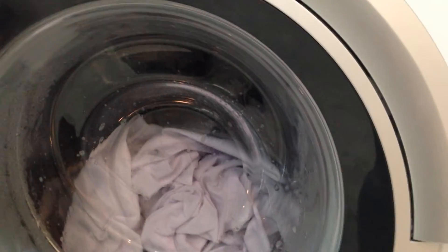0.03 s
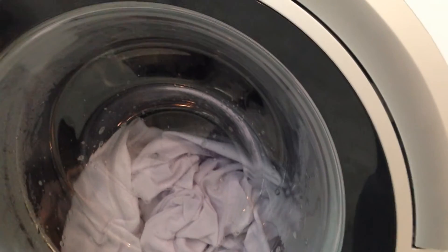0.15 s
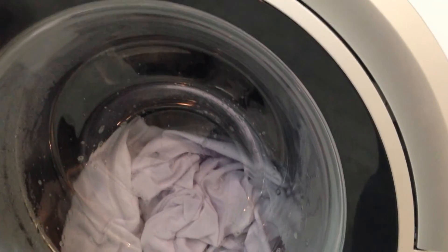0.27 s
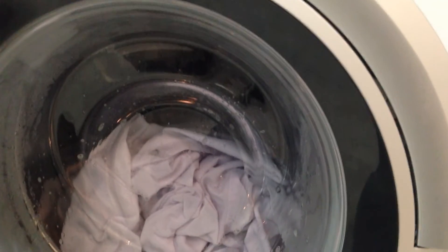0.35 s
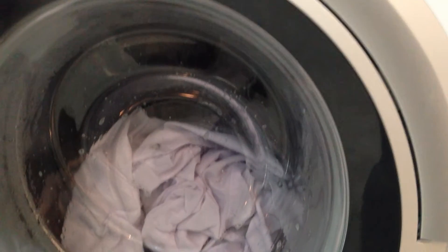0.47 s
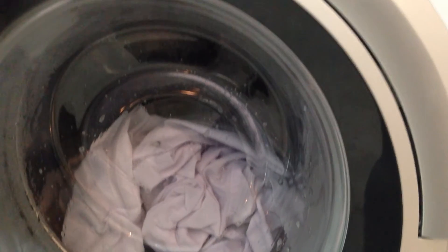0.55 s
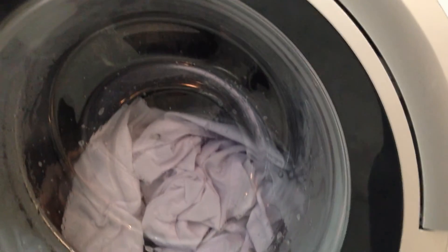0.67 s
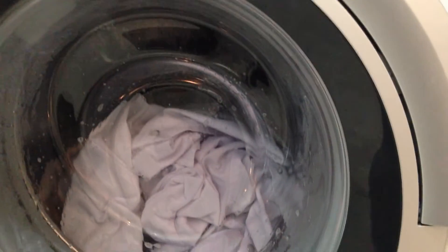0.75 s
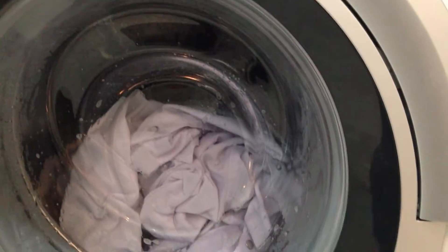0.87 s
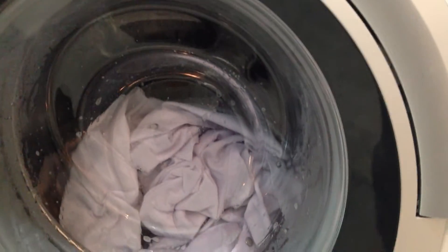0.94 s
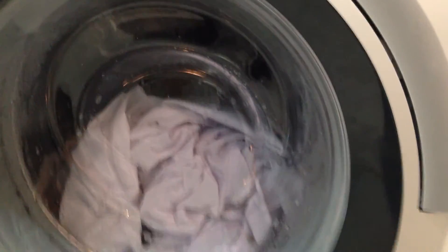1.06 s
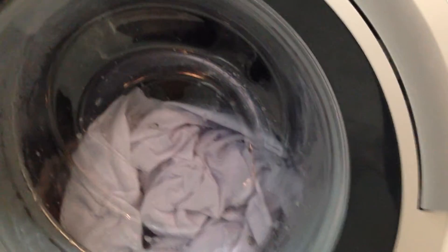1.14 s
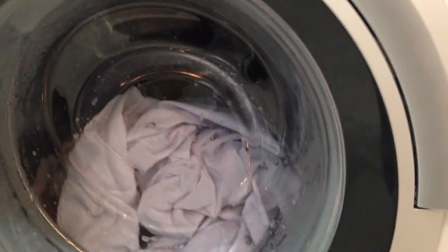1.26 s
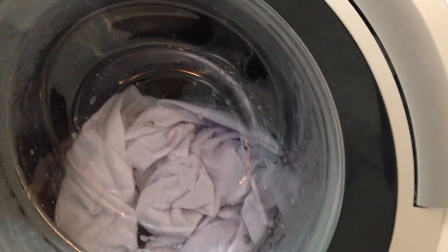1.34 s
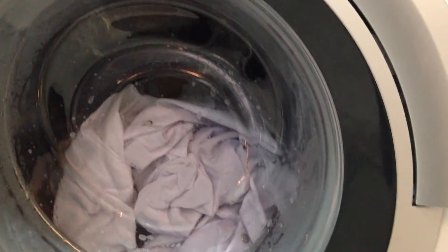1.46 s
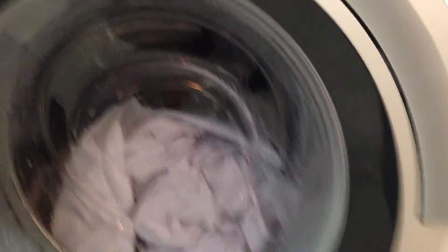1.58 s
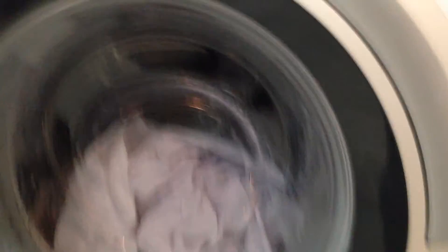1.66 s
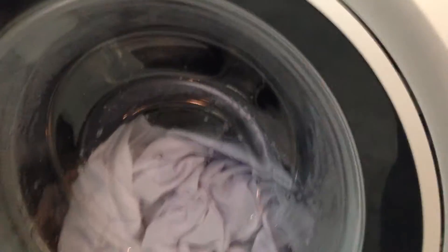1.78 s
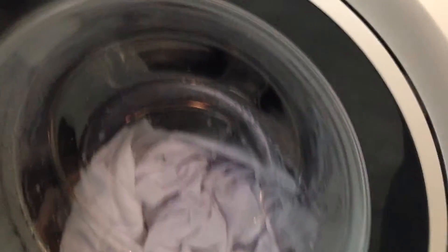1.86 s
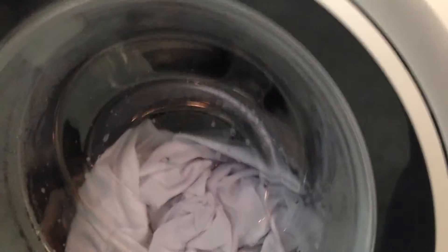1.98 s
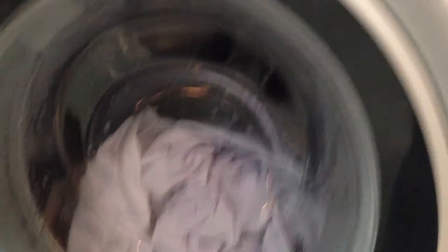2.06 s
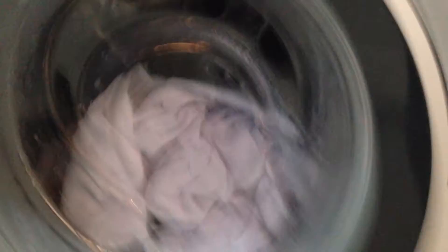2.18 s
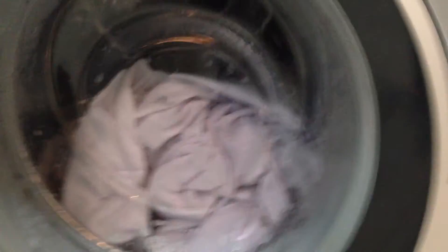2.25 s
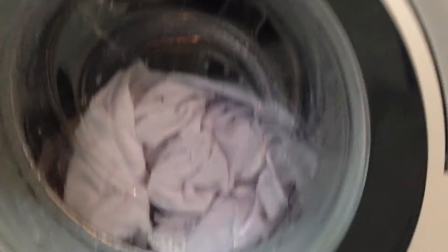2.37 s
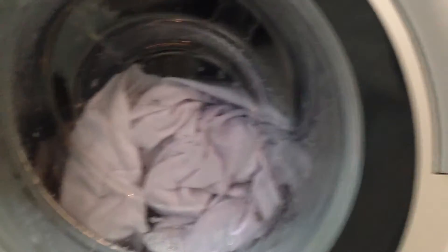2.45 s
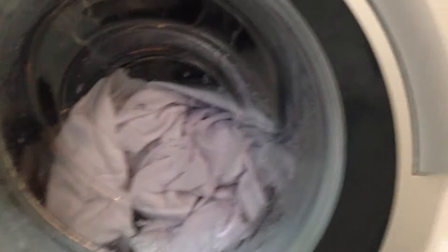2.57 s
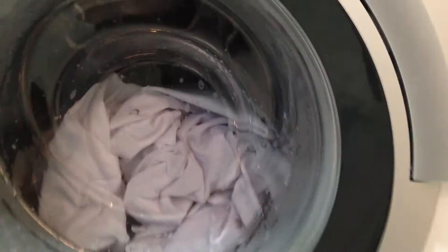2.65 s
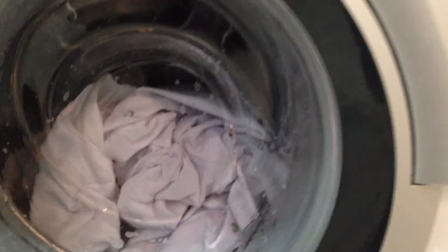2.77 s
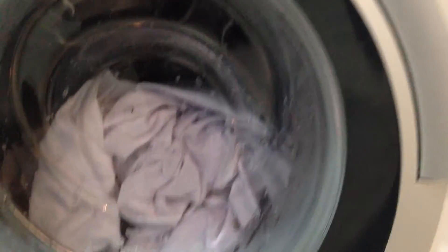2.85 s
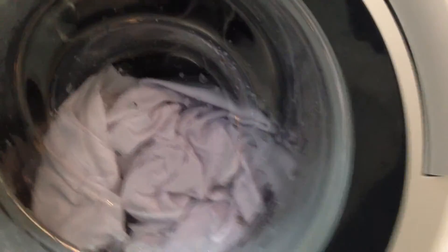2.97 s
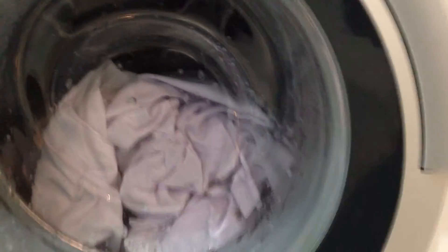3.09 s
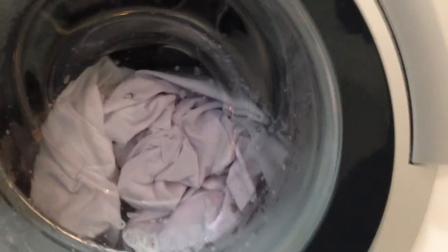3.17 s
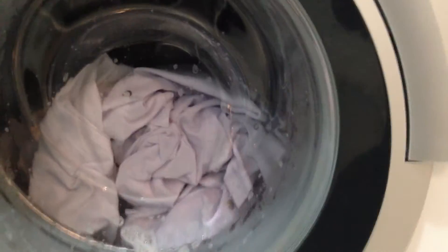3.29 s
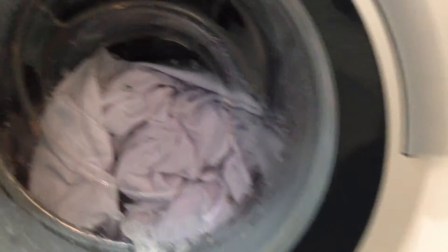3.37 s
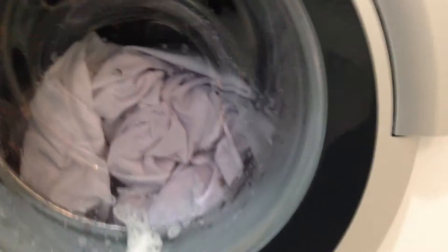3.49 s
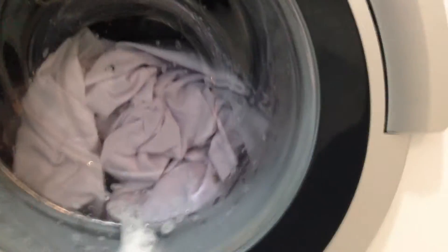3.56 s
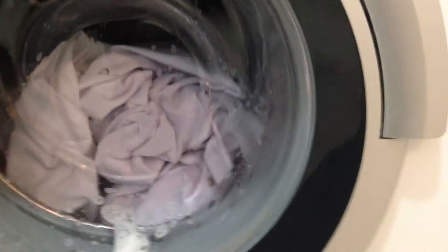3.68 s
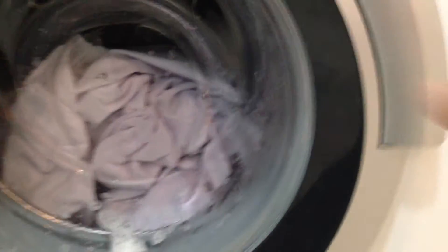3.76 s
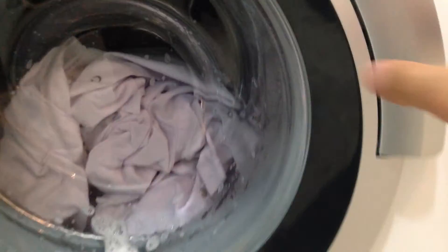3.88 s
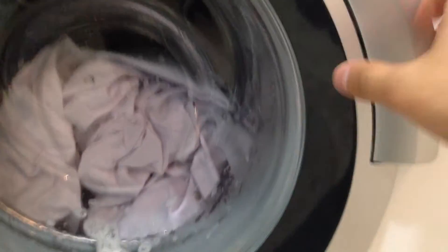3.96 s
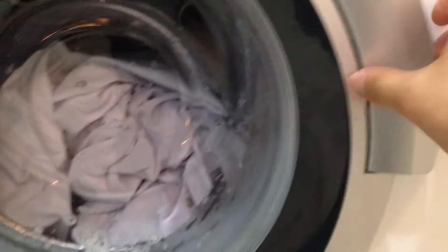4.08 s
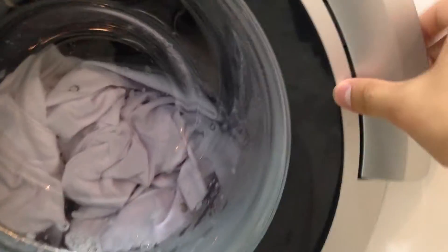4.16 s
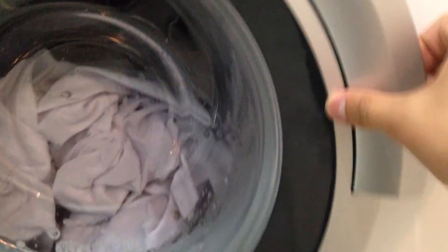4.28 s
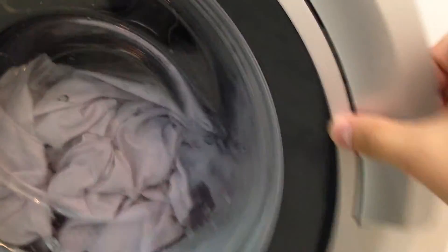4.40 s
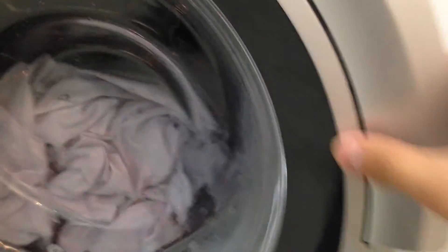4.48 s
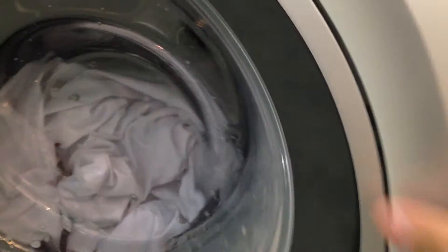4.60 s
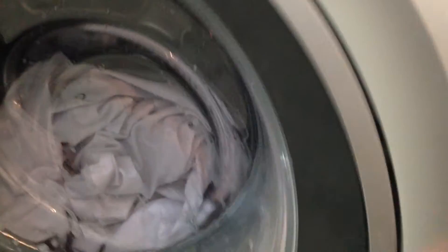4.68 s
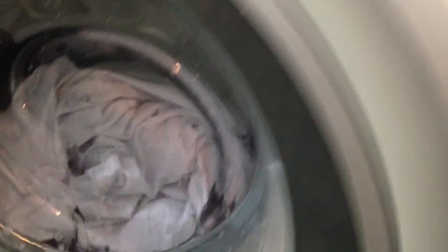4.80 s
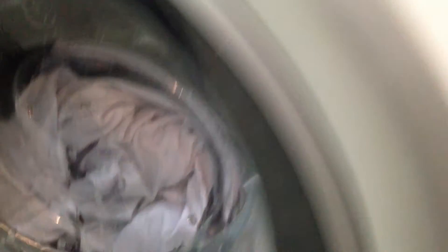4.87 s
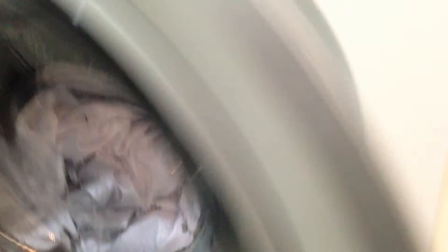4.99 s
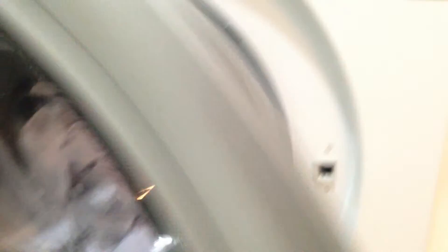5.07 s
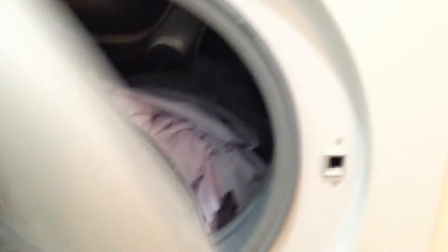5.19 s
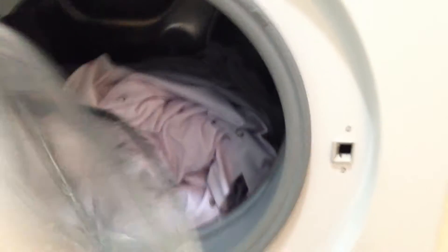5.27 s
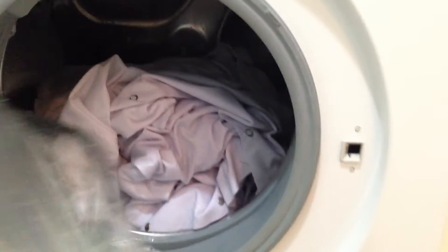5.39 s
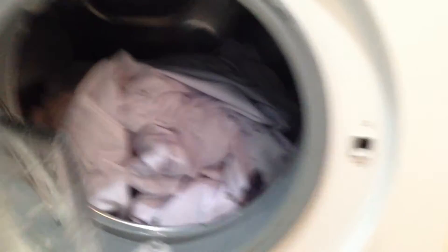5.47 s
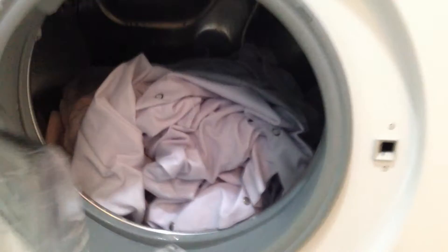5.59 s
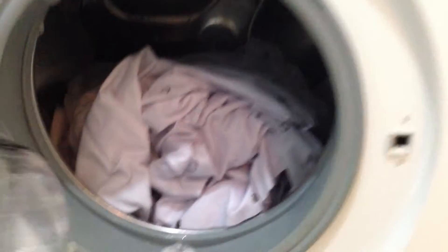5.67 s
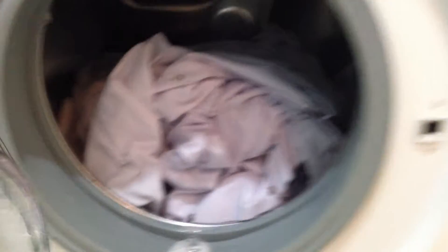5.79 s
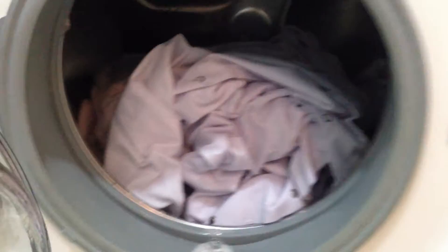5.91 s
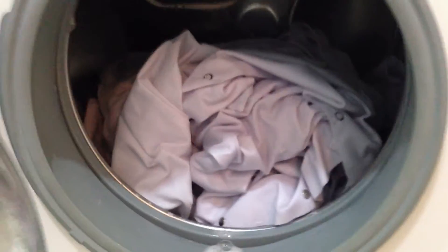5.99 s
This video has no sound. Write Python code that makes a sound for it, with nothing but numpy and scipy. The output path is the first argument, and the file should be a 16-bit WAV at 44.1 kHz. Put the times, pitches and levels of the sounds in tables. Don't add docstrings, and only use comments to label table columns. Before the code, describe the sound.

Quiet room noise, then a light electrical click with a thin ping. After some faint shuffling, a sudden metallic clack with quick rebounds and a deep boom rings briefly in the room. A duller knock follows. About half a second later comes a busy cluster of plastic handle clicks, low door thuds and a bright, dry latch snap with chatter. The close microphone then catches only soft rustle and tiny hinge ticks.

```python
import sys
import numpy as np
from scipy import signal
from scipy.fft import rfft, irfft
from scipy.io import wavfile

SR = 44100
rng = np.random.default_rng(int(sys.argv[2]) if len(sys.argv) > 2 else 0)


def convert_level_to_amplitude(level_db):
    exponent = np.asarray(level_db, float) / 20
    return 10 ** exponent


def file_out(sig):
    cols = np.atleast_2d(sig).T
    lim = np.clip(cols, -1, 1)
    pcm = np.round(lim * 32767).astype(np.int16)
    wavfile.write(sys.argv[1], SR, pcm)


N = 266408


def at_hz(points, hz):
    table_hz, values = np.array(points)[:, 0], np.array(points)[:, 1]
    return np.interp(np.log(np.maximum(hz, 1)), np.log(table_hz), values)


def band(x, low_hz, high_hz):
    return signal.sosfilt(signal.butter(2, [low_hz, high_hz], "band", fs=SR, output="sos"), x)


def rms_one(x):
    return x / np.sqrt(np.mean(x ** 2) + 1e-20)


def peak(s, db, rise_s, fall_s):
    t = np.arange(N) / SR - s
    return convert_level_to_amplitude(db - 20 * np.maximum(-t / max(rise_s, .005), t / max(fall_s, .005)))


def coloured(x, spectrum):
    size = 4096
    gain = convert_level_to_amplitude(at_hz(spectrum, np.fft.rfftfreq(size, 1 / SR)))
    cepstrum = irfft(np.log(gain))
    cepstrum[1:size // 2] *= 2
    cepstrum[size // 2 + 1:] = 0
    return signal.oaconvolve(x, irfft(np.exp(rfft(cepstrum))))[:len(x)]


def bursts(times_s, levels_db, lengths_ms):
    size = 4096
    out = np.zeros(N + size)
    turn = np.exp(-2j * np.pi * np.fft.rfftfreq(size))
    all_shares = rng.uniform(0.059, 1, (len(times_s), 5))
    for s, db, ms, shares in zip(times_s, levels_db, lengths_ms, all_shares):
        delay_samples = 1 + np.round(shares * .1 * np.clip(ms, .5, 40) * SR / 1000)
        delays = turn ** delay_samples[:, None]
        chatter = irfft(np.prod((.78 + delays) / (1 + .78 * delays), axis=0))
        out[round(s * SR):][:size] += convert_level_to_amplitude(db) * chatter
    return out[:N] + 1e-18


def ring(force, modes):
    hz, db, t60_s = np.transpose(modes)[:, :, None]
    t = np.arange(SR // 3) / SR
    response = np.sum(convert_level_to_amplitude(db - 60 * t / t60_s) * np.sin(2 * np.pi * hz * t), axis=0)
    return signal.oaconvolve(force, response)[:N]


def struck(events, modes, gain_db):
    return convert_level_to_amplitude(gain_db) * ring(bursts(*np.transpose(events)), modes)


def snap(events, colour, modes, crack_db, ring_db):
    force = bursts(*np.transpose(events))
    return convert_level_to_amplitude(crack_db) * coloured(force, colour) + convert_level_to_amplitude(ring_db) * ring(force, modes)


def swelling(rows):
    out = np.zeros(N)
    for s, db, hz, t60_s, rise_ms in rows:
        t = np.arange(min(SR, N - round(s * SR))) / SR
        swell = 1 - np.exp(-t * 1000 / rise_ms)
        out[round(s * SR):][:len(t)] += convert_level_to_amplitude(db - 60 * t / t60_s) * swell * np.sin(2 * np.pi * hz * t)
    return out


# frequency in Hz, level in dB.
FLOOR_COLOUR = [(15, -41), (25, -12.5), (55, -2), (86, -4), (183, -1.5), (215, -3.5), (281, -4),
                (349, -9.5), (445, -8.5), (567, -11.5), (895, -15), (1200, -18.5), (3830, -13.5),
                (14300, -17), (15500, -17)]


def quiet_floor():
    return convert_level_to_amplitude(-67) * rms_one(coloured(rng.standard_normal(N), FLOOR_COLOUR))


# start in
# seconds, peak in dB, pitch in Hz, t60 in seconds, rise in ms.
PUSHES = [(0.59, -64, 128, 0.88, 8.5), (0.566, -53, 248, 0.17, 4), (0.58, -60, 338.5, .3, 8),
          (.62, -57.5, 320, .2, 5), (2.33, -42, 188, 0.096, 3.1), (2.349, -42, 172, 0.13, 1.4),
          (2.332, -53, 500, 0.2, 4), (2.34, -58, 350, .1, 4), (2.355, -54, 640, 0.098, 4),
          (2.4, -62, 470, 0.074, 4.4), (3.661, -54.5, 154, 0.43, 22), (2.387, -46, 164.5, 0.21, 2.1),
          (3.066, -41, 62, .06, 3.4), (3.063, -44, 195, 0.32, 8), (3.067, -31.5, 123, 0.11, 3.6),
          (3.114, -27, 131, 0.36, 29), (3.379, -52.5, 124, 0.62, 28), (3.516, -41, 187.2, 0.29, 4.8),
          (3.539, -40, 148, 0.28, 1.1), (3.541, -40, 187, 0.33, 3.9), (3.543, -33, 55, 0.028, 3.5),
          (4.008, -38, 146, 0.24, 8.7), (4.02, -43, 182, 0.19, 8.3), (4.01, -39.5, 87, 0.12, 4.9),
          (4.179, -44, 190, 0.088, 5.9), (4.298, -21.5, 112, 0.064, 4.8), (4.401, -26, 109, 0.13, 6.1),
          (4.303, -47, 750, 0.035, 3.3), (4.319, -38, 840, 0.056, 2.4), (4.35, -36, 730, 0.034, 2.7),
          (4.393, -37, 790, 0.046, 3), (4.402, -34.5, 810, .05, 2.1), (4.41, -34, 1190, 0.045, 2.6),
          (4.418, -45, 670, .04, 3), (4.439, -45, 680, .04, 3), (4.439, -44, 1080, .03, 2.7),
          (4.364, -44, 470, 0.035, 3), (4.44, -42, 312, 0.1, 4.1)]


def thuds():
    return swelling(PUSHES)


# start in seconds, peak in dB, burst in ms.
RELAY_CONTACTS = [
    (0.568, -39, 6),
    (0.571, -38, 8.6),
    (0.584, -49, 12),
    (0.6, -55, 20),
    (0.617, -55, 15),
]
# frequency in Hz, level in dB per Hz.
RELAY_CRACK = [(120, -28), (200, -6), (957, -20), (1430, -30), (1950, -3), (2560, -28), (4750, 6),
               (9140, -10.5), (10000, -6), (13200, -11), (15500, -41)]
# frequency in Hz, level in dB, t60 in seconds.
RELAY_BODY = [(336, -21, 0.068), (511, -13.5, 0.094), (737, -16.5, 0.1), (880, -17, 0.085),
              (980, -18, 0.05), (1720, -11, 0.06), (1970, -11, 0.033), (4300, -18, 0.02), (4630, -14, 0.03),
              (5000, 2.5, 0.014), (5400, -9, .008), (8900, 3.5, 0.007), (12800, 1, 0.0046)]


def relay():
    return snap(RELAY_CONTACTS, RELAY_CRACK, RELAY_BODY, crack_db=17.0, ring_db=-9.5)


# peak time in seconds, peak in dB,
# rise in seconds for 20 dB, fall in seconds for 20 dB, loudest pitch in Hz.
RUB_STROKES = [(.6, -70.5, .02, .15, 700), (1.8, -72, 0.17, 0.43, 1790), (2.19, -64.5, 0.36, 0.27, 1090),
               (2.25, -62.5, 0.11, 0.14, 200), (2.36, -62, 0.064, 0.22, 252),
               (2.35, -70.5, 0.11, 0.18, 5000), (3.55, -56, 0.061, 0.23, 354), (3.962, -75, .5, 0.11, 2454),
               (4.04, -66, 0.082, .5, 249), (4.14, -65.5, 0.2, 0.067, 5000), (4.19, -58, .02, 0.11, 2600),
               (4.23, -54.5, 0.06, 0.54, 456), (4.4, -55, 0.014, 0.078, 900), (4.49, -59, .01, 0.21, 1800),
               (4.41, -55.5, 0.12, 0.11, 291), (4.7, -66, 0.17, 0.28, 7000), (4.76, -75, .1, 0.13, 4040),
               (5.36, -76, 1.2, 0.77, 1474), (5.6, -75, 0.52, 0.92, 4990), (5.9, -71.5, 0.41, 0.41, 4020),
               (5.98, -71, 0.39, 0.47, 250)]
# low edge in Hz, high edge in Hz.
GRAIN_HZ = [(120, 450), (450, 1400), (1400, 3000), (3000, 9000)]
BELOW_DB_PER_OCT, ABOVE_DB_PER_OCT = 6.0, 6
CLUMP_DB, CLUMP_S = 3.0, 0.014


def rustle():
    count = len(GRAIN_HZ)
    unevenness_db = 1.4 * np.minimum(rng.exponential(1, N), 4)
    grains = rng.standard_normal((count, N)) * convert_level_to_amplitude(unevenness_db)
    knots = rng.standard_normal((count, 2000))
    clump_at = np.arange(N) / SR / CLUMP_S
    clumps = np.array([np.interp(clump_at, np.arange(len(k)), k) for k in knots])
    grains = grains * convert_level_to_amplitude(CLUMP_DB * clumps)
    ranges = np.array([rms_one(band(g, *edges)) for g, edges in zip(grains, GRAIN_HZ)])
    centre_hz = np.sqrt(np.prod(GRAIN_HZ, axis=1))
    out = 0
    for s, db, rise_s, fall_s, hz in RUB_STROKES:
        octaves = np.log2(centre_hz / hz)
        colour = convert_level_to_amplitude(-np.maximum(ABOVE_DB_PER_OCT * octaves, -BELOW_DB_PER_OCT * octaves))
        out = out + peak(s, db, rise_s, fall_s) * (colour @ ranges)
    return out


# start in seconds, peak in dB, burst in ms.
PING_HITS = [(.695, -52, 20), (.703, -50, 8), (.727, -52, 10), (.76, -56, 15.5)]
# frequency in Hz, level in dB, t60 in seconds.
PING_BODY = [(349, -5, 0.083), (449, -12.5, 0.11), (1210, -20, .15), (1244, -18, 0.2), (1570, -11, 0.11),
             (1960, -10, .08), (1660, -14, 0.06), (1680, -17, 0.11), (1856, -10, 0.1), (2070, -8, 0.046),
             (2200, -17, .03), (3550, -2, 0.0054), (5000, -1, .006), (7000, 5.5, 0.0044)]


def ping():
    return struck(PING_HITS, PING_BODY, -5.5)


# start in seconds, peak in dB, pitch in Hz,
# t60 in seconds, rise in ms.
MORE_SWELLS = [(.697, -59.5, 1590, 0.47, 8), (.72, -59, 1618, 0.34, 5), (.74, -68, 1523, .6, 15),
               (3.064, -32, 870, 0.13, 3), (3.25, -65, 772, 1.0, 30), (3.13, -45, 880, .35, 20),
               (2.5, -58, 2130, .03, 2), (2.368, -56, 2050, .03, 2), (4.48, -28, 2420, 0.028, 1.5),
               (3.075, -36, 1466, .15, 5), (3.064, -30, 1170, .1, 3), (3.078, -31, 905, .09, 4),
               (3.064, -30, 1900, 0.11, 3), (3.27, -58, 300, 0.36, 15), (4.481, -38, 1150, .05, 2),
               (4.505, -41, 1200, .06, 3), (4.528, -43, 1140, .05, 3), (4.556, -45, 1240, .1, 6.9),
               (4.574, -50, 1200, .05, 3), (4.51, -46, 2500, .04, 2), (4.72, -55, 90, .15, 8),
               (3.515, -47, 85, .1, 5), (3.515, -46, 980, .05, 1.5), (3.1, -40, 1500, .2, 10)]


def more_swells():
    return swelling(MORE_SWELLS)


# start in seconds, peak in dB, burst in ms.
SCUFFS = [(1.775, -65, 23), (1.836, -53, 10), (1.85, -61, 28), (2.14, -51, 21), (2.159, -49, 10),
          (2.172, -50, 13), (2.185, -53, 13.2), (2.2, -52, 13), (2.213, -54, 9.3), (2.245, -59, 25),
          (2.27, -55, 25)]
# frequency in Hz, level in dB, t60 in seconds.
SOLE = [(520, -16, .02), (760, -5, .015), (950, -4, .02), (1230, 1.5, 0.027), (1450, -4, .02),
        (1740, -3, .015), (2480, -12, .01)]


def scuff():
    return struck(SCUFFS, SOLE, -8.0)


# start in seconds, peak in dB, burst in ms.
FINGER_TICKS = [(1.8345, -53, 5), (2.0216, -44, 9.9), (2.03, -49, 8.6), (2.0464, -53, 5),
                (2.0552, -46, 7.8), (2.062, -52, 8), (2.3276, -55, 5.4), (2.368, -56, 7), (4.019, -43.5, 6)]
# frequency in Hz, level in dB, t60 in seconds.
CASING = [(1326, -5.5, 0.03), (2120, 6.5, 0.0045), (3620, 6, 0.0028), (4660, 2, 0.0049), (9100, -2, 0.0086)]


def fingers():
    return struck(FINGER_TICKS, CASING, -7.0)


# start in seconds, peak in dB, burst in ms.
COIL_TICKS = [
    (3.041, -46, 10),
    (3.048, -51.5, 12),
]
# frequency in Hz, level in dB, t60 in seconds.
COIL_BODY = [(1100, -11.5, .02), (1900, -1, .015), (2600, -4, .01), (3800, -5.5, .008), (4950, 0, .015),
             (5700, -3, 0.011)]


def coil():
    return struck(COIL_TICKS, COIL_BODY, -5.0)


# start in seconds, peak in dB, burst in ms.
BOLT = [
    (3.0602, -29, 10),
    (3.062, -22, 9.2),
    (3.064, -19, 7.35),
    (3.0655, -12.5, 4),
    (3.067, -16.5, 6.9),
]
# start in seconds, peak in dB, burst in ms.
BOLT_REBOUNDS = [(3.071, -14.5, 6.9), (3.075, -17, 7.8), (3.08, -17.5, 6), (3.085, -18, 9.1),
                 (3.088, -15.5, 5.8), (3.101, -20.5, 9), (3.121, -25, 12.7), (3.137, -26.5, 11.6)]
# frequency in Hz, level in dB per Hz.
BOLT_CRACK = [(88, -37.5), (150, -6.5), (420, -5), (650, -12), (800, -3.5), (1150, -3), (1400, -7.5),
              (1800, -4.5), (2650, -7.5), (4140, -9.5), (9180, -16), (13800, -17), (15500, -24)]
# frequency in Hz, level in dB, t60 in seconds.
BOLT_BODY = [(274, -15.5, 0.15), (312, -9, 0.2), (386, -16.5, 0.15), (563, -11.5, 0.12), (990, -5, 0.035),
             (1000, -5.5, 0.023), (1234, -9, 0.054), (1540, -5, 0.029), (1770, -19, 0.07),
             (2320, -7.5, 0.046), (3030, -5.5, .03), (5950, -1, 0.01)]
BOLT_CUT_HZ, REBOUND_HZ = 265, 3500


def lock():
    soft = signal.lfilter(*signal.butter(1, REBOUND_HZ, fs=SR), bursts(*np.transpose(BOLT_REBOUNDS)))
    hard = signal.lfilter(*signal.butter(2, BOLT_CUT_HZ, "high", fs=SR), bursts(*np.transpose(BOLT)))
    force = hard + soft
    return convert_level_to_amplitude(29) * coloured(force, BOLT_CRACK) + convert_level_to_amplitude(-22) * ring(force, BOLT_BODY)


# peak time in seconds, level in dB, fall in seconds for 20 dB.
LOW_JOLTS = [(3.12, -50, 0.23), (3.219, -71, 0.58), (3.56, -61, 0.06), (4.051, -60, 0.22),
             (4.251, -49.5, 0.01), (4.5, -52, 0.37), (4.72, -74, -0.2)]
JOLT_RISE_S = 0.057


def rumble():
    noise = rms_one(band(rng.standard_normal(N), 50, 130))
    return noise * sum(peak(s, db + 0.5, JOLT_RISE_S, fall_s) for s, db, fall_s in LOW_JOLTS)


# start in seconds, peak in dB, burst in ms.
KNOCKS = [
    (3.514, -36, 7),
    (3.522, -38.5, 20),
]
# frequency in Hz, level in dB per Hz.
KNOCK_CRACK = [(150, -23), (250, -4), (378, -16), (526, -20), (617, -9), (1200, -5.5), (2180, -9),
               (2850, -29), (6000, -29), (7800, -62), (13200, -120)]
# frequency in Hz, level in dB, t60 in seconds.
KNOCK_BODY = [(515, -11, 0.071), (967, 2, 0.03), (1070, -4, 0.025), (1340, -9, .02)]


def knock():
    return snap(KNOCKS, KNOCK_CRACK, KNOCK_BODY, crack_db=25.5, ring_db=-9.0)


# start in seconds, peak of the grip in dB, then rim, lever and hook in dB against the grip.
HANDLE_CLICKS = [(4.021, -42.5, 1, -3.5, 6), (4.027, -50, -11, -10, -6), (4.17, -48, -14, -11, -3),
                 (4.178, -28.5, -19, -3, -8.5), (4.184, -35.5, 1.5, 1, -8), (4.19, -43, -1, 4, -2),
                 (4.198, -31.5, -12, -14, -13), (4.21, -44, 0, 0.5, -7), (4.308, -34.5, 1, -3, -10),
                 (4.322, -43, 0, -16, -8), (4.352, -35, 2, -15, -19), (4.395, -36.5, 6.5, -16, -11),
                 (4.41, -31, 6, -17, -16), (4.429, -44, 6, -19, -25), (4.443, -45, 1, -14, -27)]
GRIP_PART = 20.3, [(856, -8.5, 0.042), (894, -2, 0.033), (1000, -2.5, 0.028), (1190, -5.5, 0.023),
             (1310, -24, 0.029)]
RIM_PART = 21.4, [(317, 1, 0.034), (388, -8.5, 0.043), (491, -13, 0.045)]
LEVER_PART = 24, [(1780, -3, 0.018), (2180, -8, 0.043), (2495, -1, 0.019)]
HOOK_PART = 10.8, [(3880, 0.5, 0.011), (4460, 1, 0.0091), (5580, -2, 0.0063), (7800, -14, 0.0031),
             (11000, -14, .002)]
# low edge in Hz, high edge in Hz.
CRACK_HZ = [
    (700, 1600),
    (250, 700),
    (1600, 2900),
    (3200, 8000),
]
HANDLE_BURST_MS = 5.5


def handle():
    s, db, rim_db, lever_db, hook_db = np.transpose(HANDLE_CLICKS)
    shares_db = [0, rim_db, lever_db, hook_db]
    parts = [GRIP_PART, RIM_PART, LEVER_PART, HOOK_PART]
    out = 0
    for share_db, (crack_db, modes), edges in zip(shares_db, parts, CRACK_HZ):
        force = bursts(s, db + share_db, np.full(len(s), HANDLE_BURST_MS))
        out = out + convert_level_to_amplitude(crack_db) * band(force, *edges) + convert_level_to_amplitude(-7.5) * ring(force, modes)
    return out


# start in seconds, peak in dB, burst in ms.
LEVER_RUBS = [(4.099, -45, 6), (4.108, -51, 26), (4.118, -63, 13), (4.135, -51, 32), (4.144, -51, 10.5)]
# frequency in Hz, level in dB, t60 in seconds.
LEVER_BODY = [(423, -4.5, 0.022), (990, -3, 0.015), (1450, -8, 0.017), (2160, -1.5, 0.014),
              (3900, -6, 0.0069), (4370, -2.5, 0.0049), (7300, -3.5, .004), (10900, -6, .003)]


def lever_rub():
    return struck(LEVER_RUBS, LEVER_BODY, 2.9)


# peak time in seconds, level in dB.
TUGS = [
    (4.36, -38.5),
    (4.435, -33.5),
    (4.53, -49.5),
]
PANEL_HZ, PANEL_RISE_S, PANEL_FALL_S = 191.2, 0.0324, 0.049
SWAY_START_S, SWAY_ATTACK_S, SWAY_HOLD_S = 4.2985, 0.02, 0.167
SWAY_DB, SWAY_RELEASE_DB_PER_S = -37, 602
SWAY_HZ, SWAY_SETTLED_HZ, SWAY_SAG_S = 110, 63, 0.025


def shudder():
    t = np.maximum(np.arange(N) / SR - SWAY_START_S, 0)
    sway_hz = SWAY_SETTLED_HZ + (SWAY_HZ - SWAY_SETTLED_HZ) * np.exp(-t / SWAY_SAG_S)
    phase = 2 * np.pi * np.cumsum(sway_hz * (t > 0)) / SR
    release_db = SWAY_RELEASE_DB_PER_S * np.maximum(t - SWAY_ATTACK_S - SWAY_HOLD_S, 0)
    envelope = convert_level_to_amplitude(SWAY_DB - release_db) * np.minimum(t / SWAY_ATTACK_S, 1)
    sway = envelope * (np.sin(phase) + 0.46 * np.sin(2 * phase + 1.2))
    tug = sum(peak(s, db, PANEL_RISE_S, PANEL_FALL_S) for s, db in TUGS)
    hum = tug * np.sin(2 * np.pi * PANEL_HZ * np.arange(N) / SR)
    return np.sqrt(2) * (sway + hum)


# start in seconds, peak in dB, burst in ms.
HOOK_SNAPS = [(4.469, -49, 16), (4.4795, -20, 3.56), (4.482, -22, 4.4), (4.484, -25.5, 2.5), (4.49, -35, 5),
              (4.495, -34, 6), (4.5, -39, 8), (4.509, -39, 8), (4.515, -40, 8), (4.532, -40.5, 10),
              (4.56, -52, 17), (4.574, -54, 10.7)]
# frequency in Hz, level in dB per Hz.
HOOK_CRACK = [(180, -19.5), (300, -33), (560, -12), (800, 0), (1140, 6), (1350, 0), (1650, -5),
              (2000, -5.5), (2450, -7.5), (2930, -12), (3600, -13), (5200, -26), (15500, -59)]
# frequency in Hz, level in dB, t60 in seconds.
HOOK_BODY = [(836, -2.5, 0.053), (977, -8, 0.028), (1140, -19, 0.012), (1190, -15, 0.066),
             (1390, -5.5, 0.024), (2240, -8, 0.0058), (2400, -13, 0.008), (3550, -11, 0.012),
             (7940, -9.5, 0.0056)]


def hook_release():
    return snap(HOOK_SNAPS, HOOK_CRACK, HOOK_BODY, crack_db=27.0, ring_db=-13)


# start in seconds, peak in dB.
HINGE_TICKS = [(5.767, -53), (5.823, -51), (5.834, -55), (5.869, -52.5), (5.884, -49.5), (5.9, -63),
               (5.976, -53)]
# frequency in Hz, level in dB, t60 in seconds.
HINGE_BODY = [(624, -24, 0.02), (782, -1.5, 0.037), (960, 5, 0.015), (1197, 0.5, 0.05), (1630, 0.5, 0.019),
              (2020, -1, 0.014)]
HINGE_BURST_MS = 26


def hinge():
    return struck([(s, db, HINGE_BURST_MS) for s, db in HINGE_TICKS], HINGE_BODY, -8.0)


# frequency in Hz, t60 in seconds.
TAIL_T60 = [(100, 0.46), (500, 0.56), (1000, 0.48), (2000, 0.43), (4000, 0.43), (8000, .29), (15000, 0.19)]
# frequency in Hz, level in dB.
TAIL_DB = [(100, 6.5), (500, -1.5), (1000, -9), (2000, -4), (4000, -4), (8000, -5), (15000, -1.5)]
FLUTTER_DB, FLUTTER_S = 3.0, 0.018


def room(x):
    t = np.arange(16 * 2048) / SR
    edges_hz = 60 * 2 ** np.arange(0, 8.3, .25)
    flat_spectra = np.exp(2j * np.pi * rng.random((2, 16, 1025)))
    white = rms_one(irfft(flat_spectra).reshape(2, -1))
    build_up = np.clip((t - .003) / 0.0022, 0, 1)
    tail = 0
    for k, (low_hz, high_hz) in enumerate(zip(edges_hz, edges_hz[1:])):
        hz = np.sqrt(low_hz * high_hz)
        decay = convert_level_to_amplitude(-60 * t / max(at_hz(TAIL_T60, hz), .05)) * build_up
        flutter = np.interp(t / FLUTTER_S, np.arange(200), rng.standard_normal(200))
        decay = decay * convert_level_to_amplitude(FLUTTER_DB * flutter)
        noise = band(white[k % 2], low_hz, high_hz)
        tail = tail + convert_level_to_amplitude(at_hz(TAIL_DB, hz)) * noise * decay / np.sqrt(np.sum(decay ** 2))
    return signal.fftconvolve(x, tail)[:N]


NEAR_SHARE = 0.5


def scene():
    relay_snap, hook_snap = relay(), hook_release()
    ticks = ping() + scuff() + fingers() + coil() + lever_rub() + hinge()
    clicks = relay_snap + lock() + knock() + handle() + hook_snap + ticks
    clicks = band(clicks, 75, 19000)
    tail = room(clicks - NEAR_SHARE * (hook_snap + relay_snap))
    low = thuds() + more_swells() + rumble() + shudder()
    return (clicks + tail + low + rustle() + quiet_floor())[None]


def low_pass(x):
    return signal.sosfilt(signal.butter(12, 16060, fs=SR, output="sos"), x)


def record(dry):
    x = signal.sosfilt(signal.butter(2, 35, "high", fs=SR, output="sos"), dry)
    x = signal.sosfilt(signal.cheby2(12, 60, 16230, fs=SR, output="sos"), x)
    return low_pass(x)


dry = scene()
out = record(dry)
file_out(out)
```